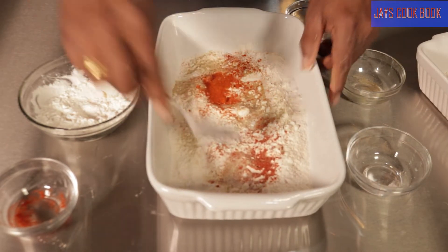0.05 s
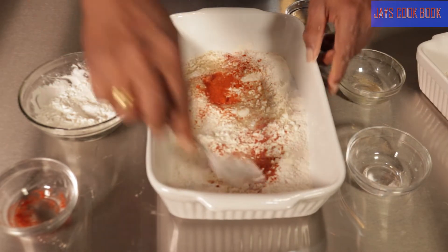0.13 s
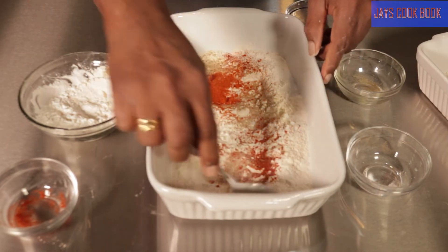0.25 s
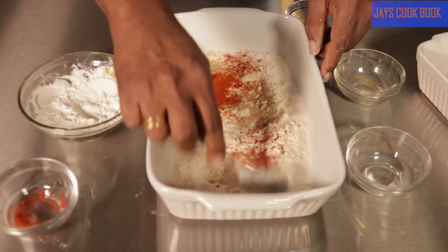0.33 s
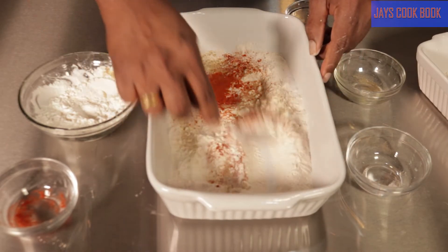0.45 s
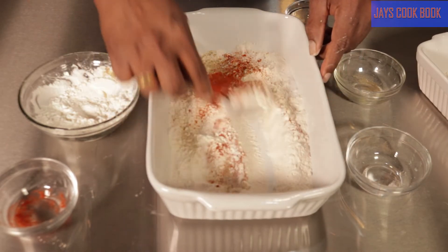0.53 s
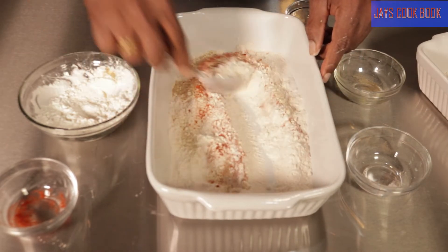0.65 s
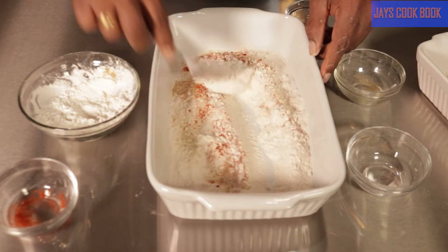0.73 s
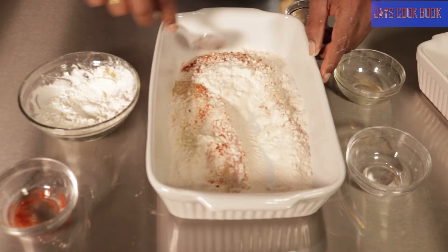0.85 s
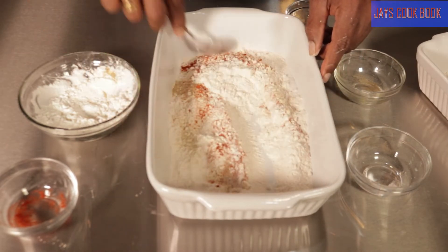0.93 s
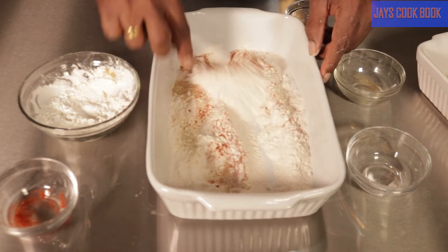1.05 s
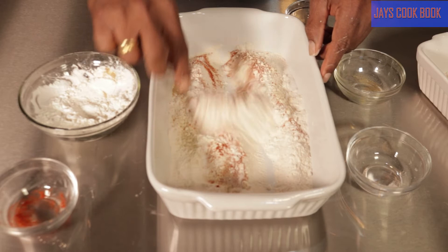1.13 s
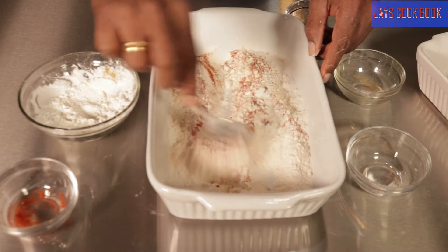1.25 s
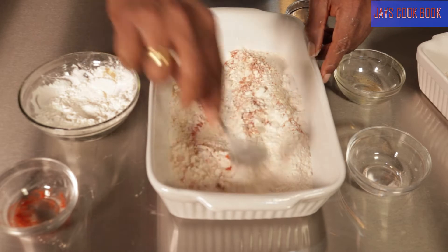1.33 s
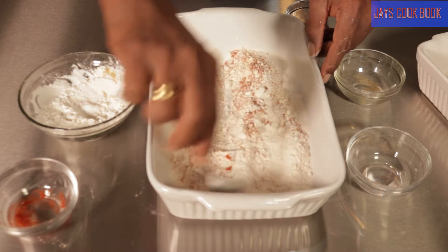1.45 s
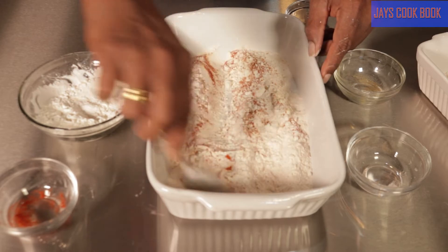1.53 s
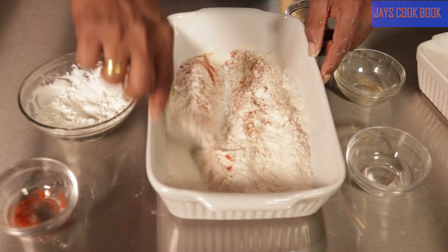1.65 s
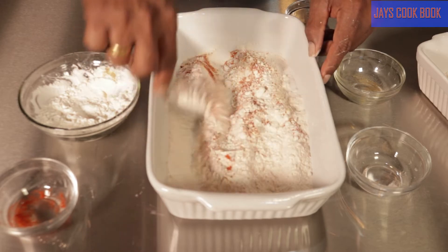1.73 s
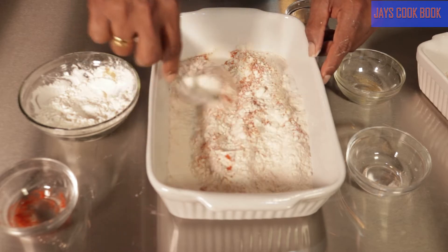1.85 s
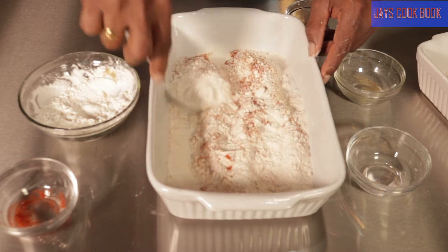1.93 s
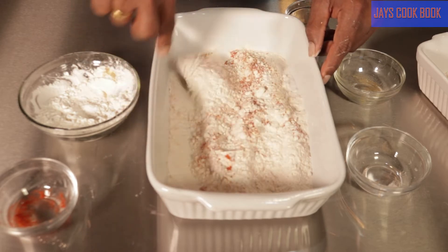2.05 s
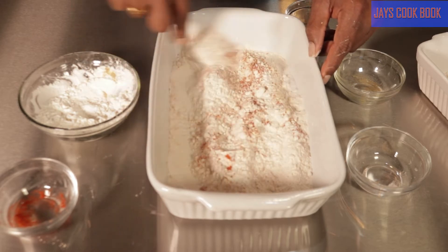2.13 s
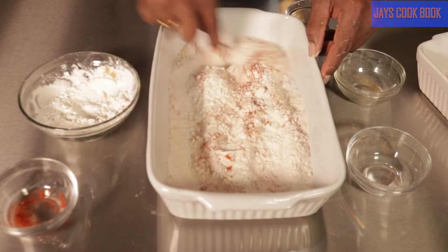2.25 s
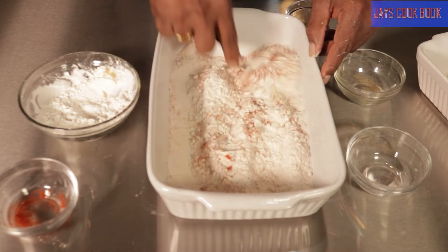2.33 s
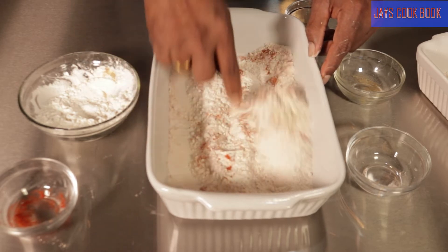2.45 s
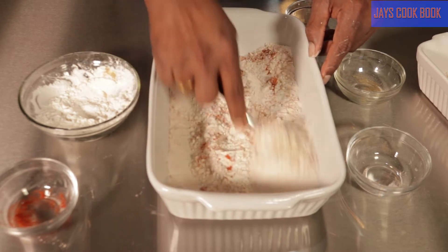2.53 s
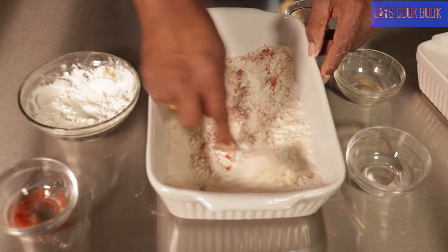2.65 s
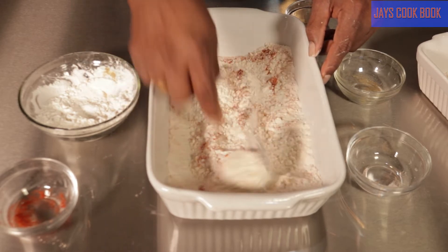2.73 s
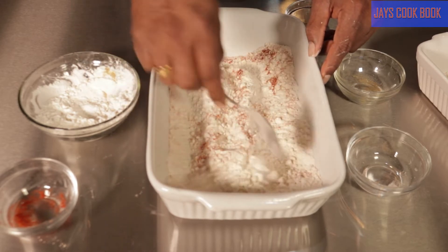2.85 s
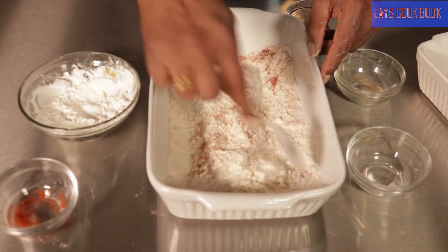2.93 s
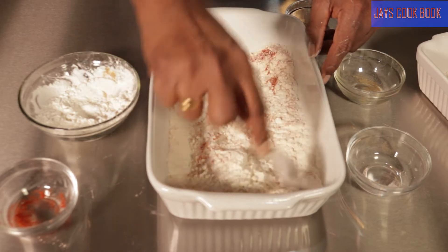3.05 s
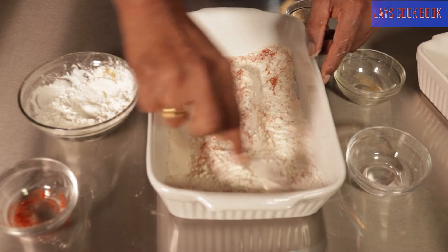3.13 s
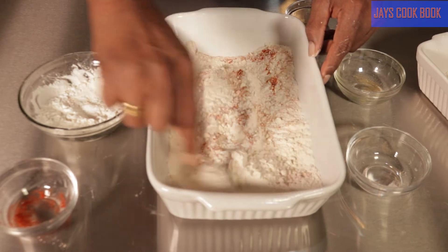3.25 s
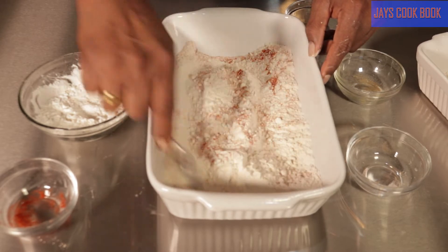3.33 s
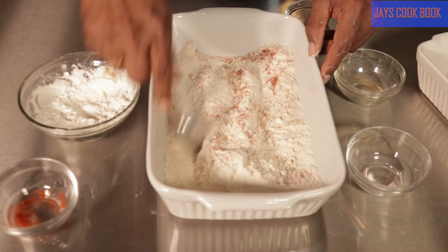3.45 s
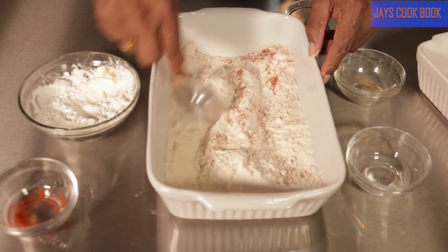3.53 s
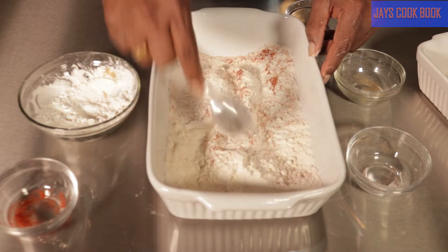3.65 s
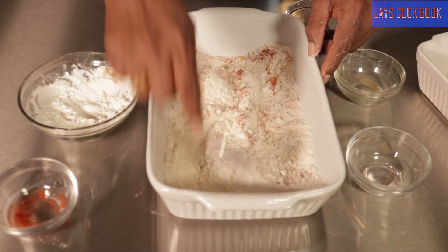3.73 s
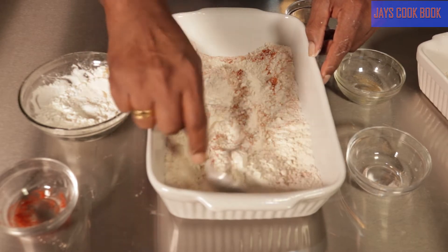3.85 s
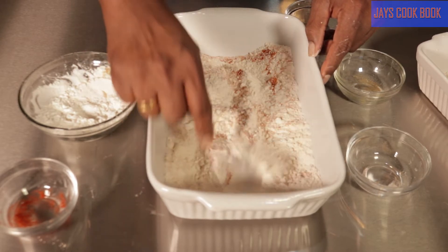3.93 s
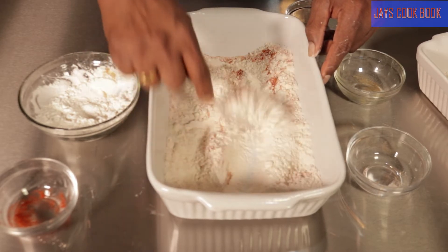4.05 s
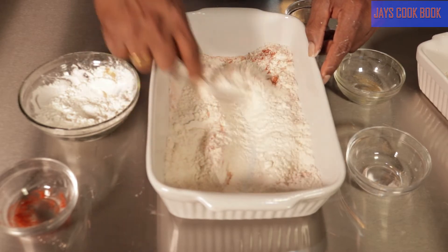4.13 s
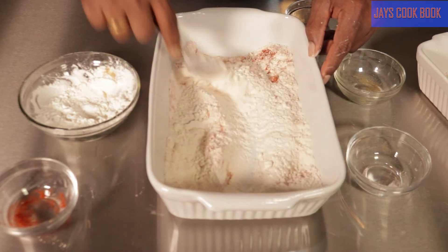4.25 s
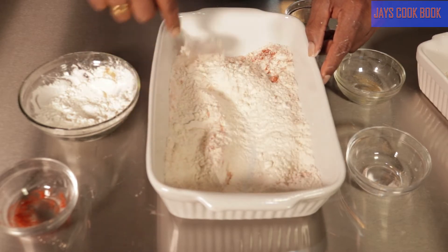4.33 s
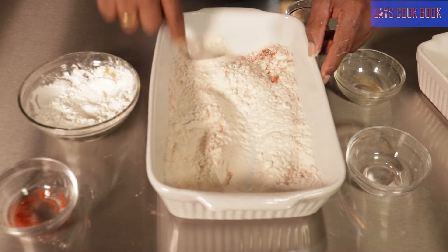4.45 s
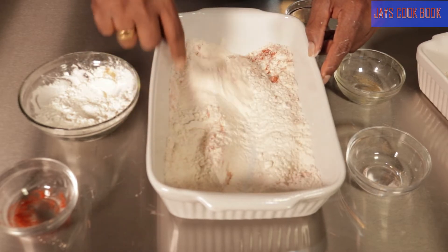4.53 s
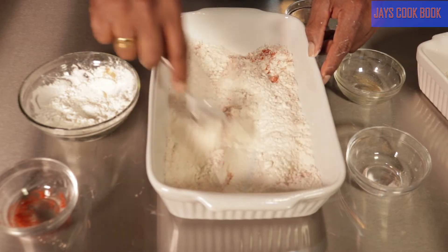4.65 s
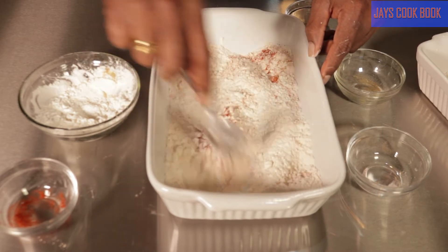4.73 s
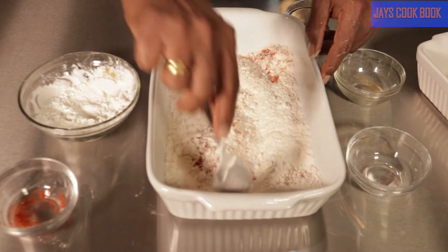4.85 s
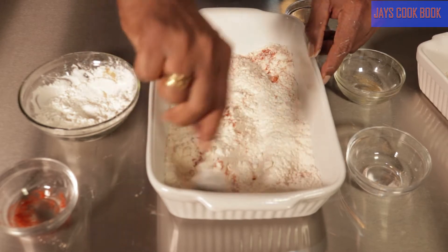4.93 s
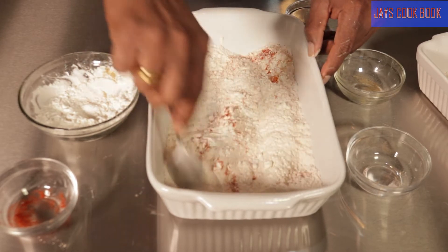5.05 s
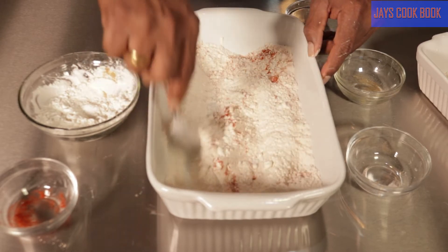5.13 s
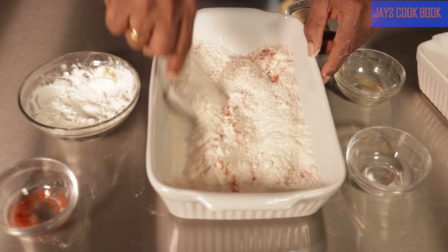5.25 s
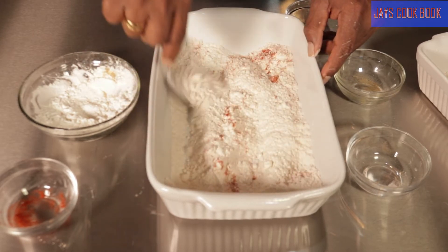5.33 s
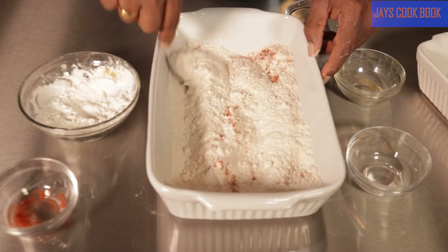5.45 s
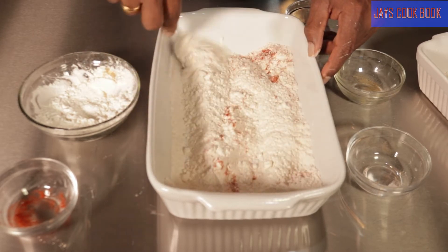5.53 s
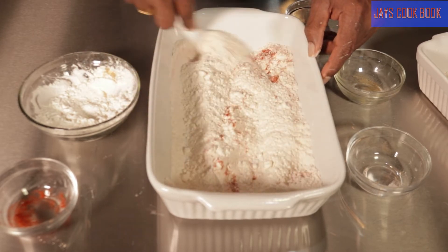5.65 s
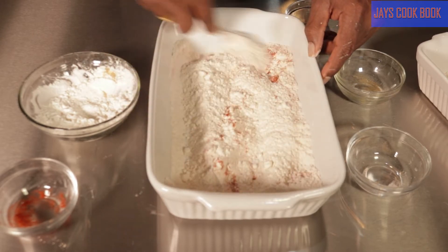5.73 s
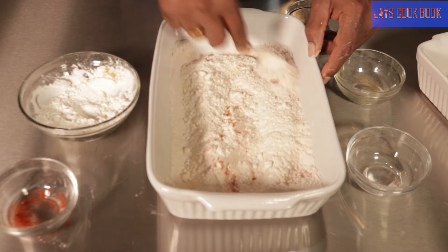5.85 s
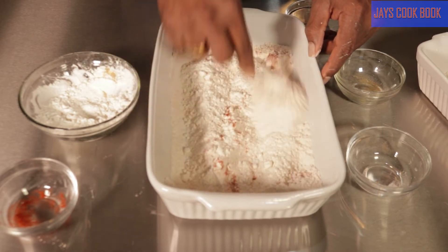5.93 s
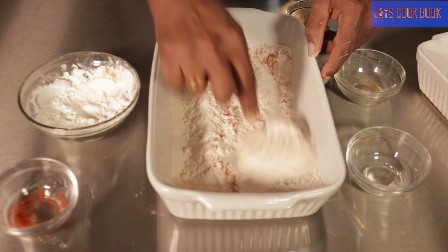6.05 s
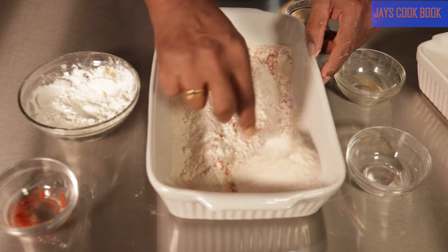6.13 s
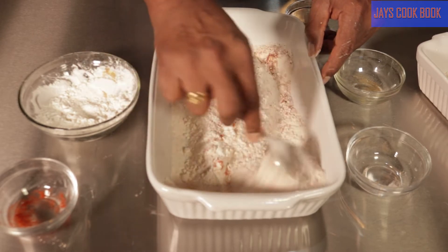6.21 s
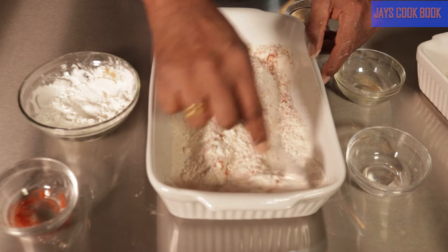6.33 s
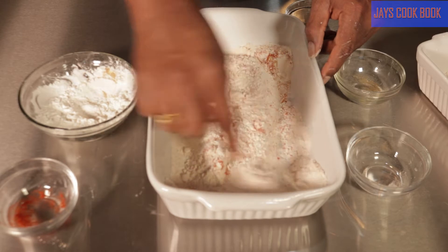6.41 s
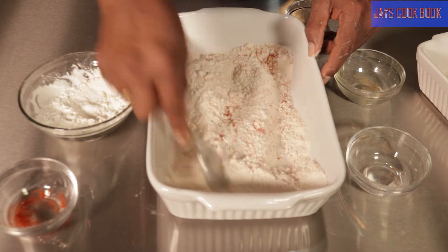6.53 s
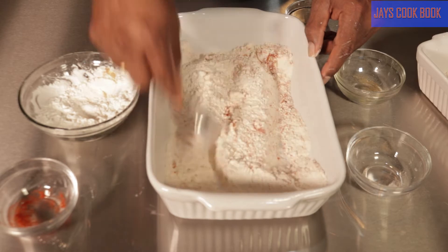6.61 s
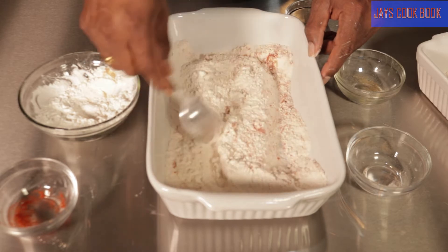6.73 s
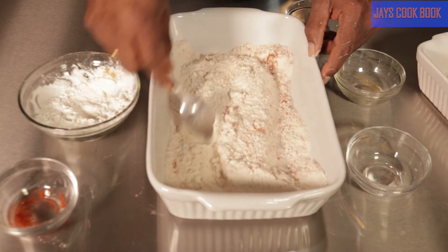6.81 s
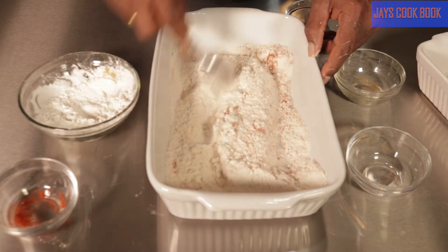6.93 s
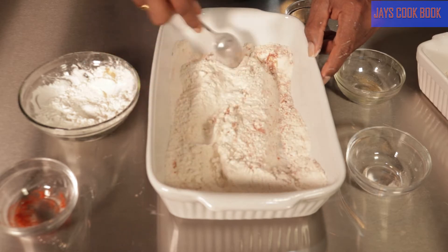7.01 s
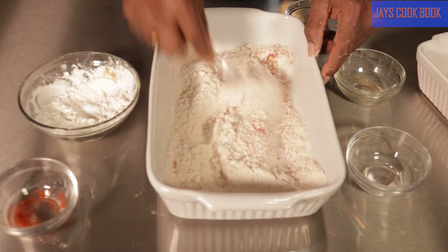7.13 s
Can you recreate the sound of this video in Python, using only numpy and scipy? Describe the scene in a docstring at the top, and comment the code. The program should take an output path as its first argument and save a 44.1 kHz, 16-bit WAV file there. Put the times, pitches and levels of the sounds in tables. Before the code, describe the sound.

A steel spoon stirs dry flour in a ceramic baking dish, heard close in a hard-walled kitchen. Sharp, bright clinks with short rings dominate the first three seconds, the loudest slightly overloaded. Short gritty scrapes fall between them, then stronger scraping and muffled taps take over. Faint low bumps rumble elsewhere in the house above very quiet room air.

```python
"""Hard-walled kitchen: a steel spoon stirs dry flour in a ceramic baking dish on a counter.
Clinks are a noise crack plus dish modes; taps through the flour are damped clinks with a short knock.
Scrapes over the glaze are random grains driving spoon resonances and dish modes.
Far off in the house dull bumps rumble as coloured noise, over quiet air of steady random spectra.
Sparse echoes answer the dish; the loudest clinks overload the recorder."""
import sys
import numpy as np
from scipy import signal
from scipy.fft import rfft, irfft
from scipy.io import wavfile
from scipy.ndimage import uniform_filter1d

SR = 44100
rng = np.random.default_rng(int(sys.argv[2]) if len(sys.argv) > 2 else 0)


def waveform_to_disk(signal):
    """Save audio, clipped to [-1, 1], as 16-bit WAV at the path in sys.argv[1]."""
    frames = np.transpose(np.atleast_2d(signal))
    scaled = np.clip(frames, -1, 1) * 32767
    samples = np.round(scaled).astype(np.int16)
    wavfile.write(sys.argv[1], SR, samples)


N = 316638

# Quiet kitchen air, relative spectrum: (frequency [Hz], density [dB])
AIR_SPECTRUM = [(25, -16), (274, -7.5), (686, -13.5), (1720, -15.5), (5090, -25.5), (7510, -23.5),
                (15500, -30.5)]
# Decay of the kitchen echoes: (frequency [Hz], t60 [s])
KITCHEN_T60 = [(100, 0.24), (500, 0.92), (1500, 0.45), (5000, 0.36), (12000, 0.3)]
# Dull bumps far off in the house: (time [s], level [dB], gain at 900 Hz and above [dB])
THUD_EVENTS = [(0.534, -42.5, 10), (1.485, -42.5, -3), (2.057, -35, 26.5), (2.697, -33.5, 15),
               (3.39, -40.5, 11), (5.89, -41, 1)]
# Rumble of the bumps, relative spectrum: (frequency [Hz], density [dB])
RUMBLE_SPECTRUM = [(30, -21), (160, -6), (300, 0.5), (510, -6), (700, -21.5), (1500, -29.5), (3500, -48.5),
                   (8000, -74)]
# Modes of the dish's floor: (frequency [Hz]) and (strength [dB])
FLOOR_MODE_HZ = [908, 1260, 1345, 1850, 2600, 2885, 3345, 4290, 5495, 5765, 6145, 6500, 8420, 10050, 11200,
                 13500]
FLOOR_MODE_DB = [-12, -3.5, -4, -5.5, -10.5, -11.5, -10.5, -10.5, -2.5, 2, -6.5, -4, -1, -3, -9, -12]
# Modes of the dish's wall: (frequency [Hz]) and (strength [dB])
WALL_MODE_HZ = [1230, 1347, 1900, 3030, 3350, 5235, 6590, 6655, 7872, 8360, 9420, 10090, 11700, 14865]
WALL_MODE_DB = [1, 4, -7, -5.5, -8, 4, -10.5, -5, 6.5, -4.5, -1, -11.5, 5, -10.5]
# Decay of the dish modes: (frequency [Hz], t60 [s])
MODE_T60 = [(1300, 0.12), (3000, 0.16), (6000, 0.1)]
# Spoon on bare dish: (time [s], level [dB], 350 Hz body [dB], 3.3 kHz [dB], 6.5 kHz [dB], 12 kHz [dB],
# spot struck [0 floor to 1 wall], ring against crack [dB])
CLINK_EVENTS = [(0.232, -3.5, -14, -6, -1, -20, 0.23, 0), (0.93, -6, -13.5, -1.5, 3.5, -5.5, 0.89, -4.5),
                (1.46, -11, -10.5, -12.5, -11, -17.5, 0.22, -5.5),
                (1.95, -9.5, -7, -8.5, -13.5, -21.5, 0.16, 4),
                (3.077, -8, -9.5, 3, -0.5, -13.5, 0.086, -1.5), (4.917, -15, -5.5, -2.5, 5, 0, 0.23, -8)]
# Muffled taps through the flour: (time [s], level [dB], body [dB], treble [dB], knock [Hz])
TAP_EVENTS = [(0.3, -22, 12.5, -24, 593), (1.496, -18, 8, -32, 1270), (2.141, -22.5, 5, -18, 1300),
              (2.342, -15, -6, -26, 2280), (4.428, -28, 11, -20.5, 1180), (5.105, -24, 9, -19, 3390),
              (5.376, -18.5, -15.5, -19.5, 1640), (5.567, -9, -6, -16.5, 2640),
              (6.5, -29.5, 13.5, -24.5, 1156), (7.13, -14, 0, -27.5, 1156)]
# Pushes of the spoon over the glaze: (start [s], rise [s], fall [s], peak level [dB], 3 kHz edge [dB],
# 4.4 kHz edge [dB], hiss [dB], grit [dB],
# second resonance, set by the spoon's tilt: first [Hz], last [Hz], level offset [dB])
STROKE_EVENTS = [(.29, 0.013, 0.81, -31, -9.5, -8, -8, -13, 1800, 1700, 9),
                 (.4, 0.057, 0.068, -30, -4.5, -9.5, -7, -11, 1770, 2030, -1),
                 (0.499, 0.051, 0.11, -30, -8, -19, -8, -6.5, 1600, 1940, -1.5),
                 (1.01, 0.059, 0.25, -34, -4.5, -7.5, -4.5, -15, 1710, 1740, 8),
                 (1.119, 0.058, 0.041, -27.5, -14, -11.5, -13.5, -10, 1950, 1705, -1),
                 (1.55, 0.15, 0.11, -32, -8, -3, -3.5, 2.5, 2000, 2230, 2.5),
                 (2.01, 0.014, 0.31, -32, -28, -11, -14.5, -4, 1880, 2180, -0.5),
                 (2.09, 0.098, 0.033, -35, -17, -20, -23, -1.5, 2200, 2590, 6),
                 (2.52, 0.044, 0.11, -47.5, -24.5, -20.5, -9.5, -10, 1856, 1860, -0.5),
                 (3.19, 0.031, 0.068, -33.5, -35, -15, -14, 3.5, 2290, 2050, 9.5),
                 (3.903, 0.11, 0.23, -26.5, -2.5, -9, -8.5, -6.5, 1880, 1860, 6),
                 (4.552, 0.029, 0.045, -34, -7.5, -5, -5, -17, 1920, 1790, -3),
                 (5.03, 0.068, 0.03, -34, -24, -17, -7, 0, 1820, 1830, -24),
                 (5.13, 0.061, 0.065, -23, -24, -31, -16, -7, 1880, 1890, -5.5),
                 (5.2, 0.03, 0.2, -30.5, -7.5, -30, -6, -5, 2000, 2320, -8),
                 (5.36, 0.12, 0.19, -39, -28, -20, -8, -4.5, 1860, 1820, -3),
                 (5.58, 0.11, 0.8, -40, -26, -12, -11.5, -5, 1730, 1810, -8),
                 (5.76, 0.23, 0.24, -31, -6.5, -12, -12.5, -4, 1840, 1844, -0.5),
                 (6.538, 0.065, 0.023, -27.5, -6, -12, -24, 0, 2150, 1570, 11.5)]
# Spoon bowl damped by flour: (frequency [Hz], width [Hz], level [dB])
BOWL_MODES = [(860, 800, -3.5), (1299, 272, 9.5), (1824, 340, 7)]
# Spoon edge: (frequency [Hz], width [Hz])
EDGE_MODES = [(3050, 300), (4380, 500)]
# Spoon hiss: (frequency [Hz], width [Hz], level [dB])
HISS_MODES = [(5360, 1600, 3), (6960, 1800, 4), (7900, 1200, 8), (9160, 740, 1), (11860, 1300, -2.5)]

AIR_DB = -52
LIKENESS = 0.35  # left-right likeness of the air, 0 to 1
RUMBLE_SIDE = 0.3  # share of the rumble that differs left from right
MODE_TURN_RAD = 1.066  # spread of each mode's phase between the sides
KNOCK_DB, KNOCK_T60_S = 0, 0.016
RISE_DB = -19.5  # stroke start against its peak
FALL_DB_PER_S = -70  # mean loss as the spoon slows, until it lifts off
LIFT_BEND = 1.26  # the fall starts slowly and steepens towards the lift
EDGE_DULLS, HISS_DULLS = 1, 0.97  # extra loss [dB] per dB that the slowing spoon falls
WAVER = 0.017  # rms share by which the spoon resonances drift
GLAZE_RING_DB, FLOUR_T60_S = -7.5, 0.05  # dish modes rung by the scrape; extra damping by flour
BAND_LIMIT_HZ = 15650


def gain_of(db):
    """Converts dB to amplitude."""
    return 10 ** (np.asarray(db) / 20)


def evened(x):
    """Scales to rms 1."""
    return x / np.sqrt(np.mean(x ** 2) + 1e-20)


def read(points, hz):
    """Interpolates a table on a log-frequency axis."""
    f, value = np.transpose(points)
    return np.interp(np.log(hz + 1), np.log(f + 1), value)


def shaped(x, points):
    """Colours x by a (frequency [Hz], gain [dB]) table."""
    hz = np.fft.rfftfreq(x.shape[-1], 1 / SR)
    return irfft(rfft(x) * gain_of(read(points, hz)), x.shape[-1])


def wander(length, span):
    """Twice-smoothed noise of rms 1; span in samples."""
    noise = rng.standard_normal(length)
    return evened(uniform_filter1d(uniform_filter1d(noise, span), span))


def resonate(x, hz, width_hz):
    """Gliding resonance: shifts the curve hz down to zero, smooths twice, shifts back."""
    turn = np.exp(2j * np.pi * np.cumsum(hz) / SR)
    r = np.exp(-np.pi * width_hz / SR)
    smooth = signal.lfilter([(1 - r) ** 2], [1, -2 * r, r * r], x / turn)
    return (turn * smooth).real / np.sqrt(width_hz)


def add(mix, start_s, sound):
    """Mixes a sound in at start_s, cut at the end of the mix."""
    part = mix[:, round(start_s * SR):][:, :sound.shape[-1]]
    part += sound[..., :part.shape[-1]]


def panned(x, db):
    """Makes the left side db louder than the right."""
    return x * gain_of([[db / 2], [-db / 2]])


def air():
    """Quiet air: steady random spectra with faint drifting patches."""
    frames, hz = N // 256 + 5, np.fft.rfftfreq(1024, 1 / SR)
    a, b, c, d, patches = rng.standard_normal((frames, 513, 5)).T
    patches = evened(uniform_filter1d(uniform_filter1d(patches, 12, 0), 20, 1))
    same = np.clip(LIKENESS, -1, 1)
    left, other = a + 1j * b, c + 1j * d
    z = np.array([left, same * left + np.sqrt(1 - same ** 2) * other])
    z *= gain_of(read(AIR_SPECTRUM, hz)[:, None] + 0.62 * patches)
    noise = signal.istft(z, nperseg=1024, noverlap=768)[1][:, :N]
    return gain_of(AIR_DB) * evened(noise)


def thud(db, bright_db):
    """Soft low push, then a lumpy rumble that dies in far rooms, nearly alike on both sides."""
    t = np.arange(1.4 * SR) / SR
    noise = rng.standard_normal((3, len(t)))
    colour = [(450, 0.013), (900, bright_db)]
    mid, side = (evened(shaped(shaped(z, RUMBLE_SPECTRUM), colour)) for z in noise[:2])
    rumble = np.array([mid + RUMBLE_SIDE * side, mid - RUMBLE_SIDE * side])
    rumble = rumble * gain_of(2.8 * wander(len(t), 2000) - 60 * t / 1.56)
    room_mode = evened(resonate(noise[2], np.full(len(t), 84.), 17)) * gain_of(-12.5 - 60 * t / 2.0)
    panel_hum = evened(resonate(noise[2], np.full(len(t), 505.), 30)) * gain_of(-7.0 - 60 * t / 1.7)
    push = np.sin(2 * np.pi * 150 * t) * gain_of(-60 * t / 0.039) * np.minimum(t / 0.0061, 1)
    onset = np.minimum(t / 0.0054, 1)
    return gain_of(db) * ((rumble + room_mode + panel_hum) * onset + 3.9 * push)


def kitchen(x):
    """Sparse echoes of random sign, each band dying at its own speed; bass alike on both sides."""
    echoes = np.zeros((2, SR))
    at = np.arange(120, SR - 20, 20) + rng.integers(0, 20, (2, (SR - 121) // 20))
    np.put_along_axis(echoes, at, rng.choice([-1., 1.], at.shape), 1)
    hz, t, z = signal.stft(echoes, SR, nperseg=512)
    same = np.clip(read([(400, 1.0), (900, 0.019)], hz), 0, 1)[:, None]
    z[1] = same * z[0] + np.sqrt(1 - same ** 2) * z[1]
    decay = gain_of(-60 * t / read(KITCHEN_T60, hz)[:, None])
    tail = signal.istft(z * decay, SR, nperseg=512)[1]
    return signal.fftconvolve(x, tail / np.linalg.norm(tail[0]), axes=1)[:, :N]


def ring(hz, db, t):
    """Dish modes: dying sines of random phase and fluttering level, phases differing left and right."""
    hz, db = np.array([hz, db])[:, :, None]
    flutter_db = 5.65 * np.array([wander(len(t), 200) for _ in hz])
    phase = 2 * np.pi * rng.random(hz.shape) + MODE_TURN_RAD * rng.standard_normal((2, *hz.shape))
    level = gain_of(db + flutter_db - 60 * t / read(MODE_T60, hz))
    return (level * np.sin(2 * np.pi * hz * t + phase)).sum(1)


def clink(db, body_db, mid_db, high_db, top_db, wall, ring_db, crack_t60_s=0.021, size=SR // 4):
    """Spoon on dish: a short noise crack and the floor and wall modes, weighted by the spot struck."""
    t, wall = np.arange(size) / SR, np.clip(wall, 0, 1)
    floor_ring = ring(FLOOR_MODE_HZ, FLOOR_MODE_DB, t)
    wall_ring = ring(WALL_MODE_HZ, WALL_MODE_DB, t)
    rung = (1 - wall) * floor_ring + wall * wall_ring
    crack = rng.standard_normal(len(t)) * gain_of(-60 * t / crack_t60_s)
    colour = [(130, body_db - 17.0), (350, body_db), (1500, 0.003),
              (3300, mid_db), (6500, high_db), (12000, top_db)]
    blow = (gain_of(ring_db) * rung + 4 * crack) * np.minimum(t / 0.001, 1)
    padded = np.hstack([blow, 0 * blow])  # room for the filter tail
    return gain_of(db) * shaped(padded, colour)[:, :len(t)]


def tap(db, body_db, treble_db, knock_hz):
    """A clink that the flour damps: quick, dull, little ring, one short knock."""
    dull = clink(db, body_db, 0.63 * treble_db, treble_db, treble_db - 7.0, 0.36, -12.5,
                 crack_t60_s=0.018, size=SR // 8)
    t = np.arange(dull.shape[-1]) / SR
    knock = gain_of(db + KNOCK_DB - 60 * t / KNOCK_T60_S) * np.sin(2 * np.pi * knock_hz * t)
    return dull + knock * np.minimum(t / 0.00065, 1)


def spoon(grains, modes, tilt, follow):
    """Spoon resonances driven by grains, each swelling and wavering; tilt shifts each by its own power."""
    total = 0
    for (hz, width_hz, db), power in zip(modes, follow):
        swell = gain_of(db + 2.3 * wander(len(grains), 1500))
        curve_hz = hz * tilt ** power * (1 + WAVER * wander(len(grains), 2000))
        total = total + swell * resonate(grains, curve_hz, width_hz)
    return evened(total)


def scrape(start_s, rise_s, fall_s, peak_db, edge_db, tip_db, hiss_db, grit_db,
           first_hz, last_hz, second_db):
    """Dense uneven grains under the spoon's edge drive its damped resonances and the low dish modes."""
    t = np.arange(0, rise_s + fall_s, 1 / SR)
    slowing_db = FALL_DB_PER_S * fall_s * (np.maximum(t - rise_s, 0) / fall_s) ** LIFT_BEND
    db = peak_db + RISE_DB * np.maximum(1 - t / rise_s, 0) ** 2 + slowing_db
    edge_dull = gain_of(EDGE_DULLS * slowing_db)
    hiss_db = hiss_db + HISS_DULLS * slowing_db

    size_db = 2.0 * np.minimum(rng.exponential(1, len(t)), 5) + 2.2 * wander(len(t), 220)
    sign = rng.choice([-1., 1.], len(t))
    grains = gain_of(size_db) * sign * (rng.random(len(t)) < 8000 / SR)  # 8000 grains/s

    tilt = np.linspace(first_hz, last_hz, len(t)) / BOWL_MODES[2][0]
    bowl_modes = BOWL_MODES[:2] + [np.add(BOWL_MODES[2], (0, 0, second_db))]
    sound = spoon(grains, bowl_modes, tilt, [0, .4, 1])
    sound = sound + gain_of(hiss_db) * spoon(grains, HISS_MODES, tilt, [.05] * 5)
    for mode, level_db, power in zip(EDGE_MODES, (edge_db, tip_db), (-.4, .6)):
        sound = sound + edge_dull * gain_of(level_db) * spoon(grains, [(*mode, 0)], tilt, [power])

    # gritty flour sliding, without resonance
    powder = shaped(grains, [(120, -23.5), (500, -2.5), (2700, 6.5), (4500, -5.0), (15000, -24.0)])
    low_cut = signal.butter(2, 170, "high", fs=SR)  # a small dish radiates little bass
    sound = signal.lfilter(*low_cut, sound + gain_of(grit_db) * evened(powder))

    after = np.arange(SR // 20) / SR
    modes = ring(FLOOR_MODE_HZ[:7], FLOOR_MODE_DB[:7], after) * gain_of(-60 * after / FLOUR_T60_S)
    touch = gain_of(db) * signal.windows.tukey(len(t), .08)
    drive = touch * evened(grains)
    rung = signal.fftconvolve(drive[None], modes / np.linalg.norm(modes[0]), axes=1)
    direct = np.pad(touch * sound, (0, rung.shape[1] - len(t)))
    return start_s, gain_of(GLAZE_RING_DB) * rung + direct


def scene():
    """Quiet air, far bumps, and the dish close by with its echoes."""
    dish, house = np.zeros((2, N)), np.zeros((2, N))
    for start_s, *blow in THUD_EVENTS:
        add(house, start_s, thud(*blow))
    for start_s, *blow in CLINK_EVENTS:
        add(dish, start_s, clink(*blow))
    for start_s, *blow in TAP_EVENTS:
        add(dish, start_s, tap(*blow))
    for stroke in STROKE_EVENTS:
        add(dish, *scrape(*stroke))
    dish = panned(dish, -2.0)
    return air() + house + gain_of(-3.5) * kitchen(dish) + dish


def record(dry):
    """Hard clipping at full scale, then the band limit."""
    low_pass = signal.firwin(511, BAND_LIMIT_HZ, window=("kaiser", 9), fs=SR)
    return signal.oaconvolve(np.clip(dry, -1, 1), low_pass[None], "same")


dry = scene()
out = record(dry)
waveform_to_disk(out)
```